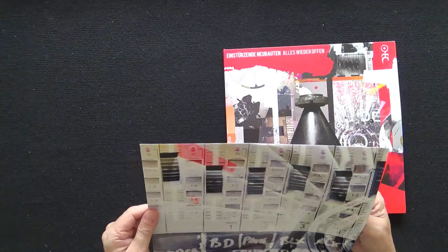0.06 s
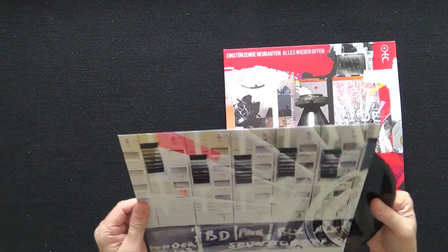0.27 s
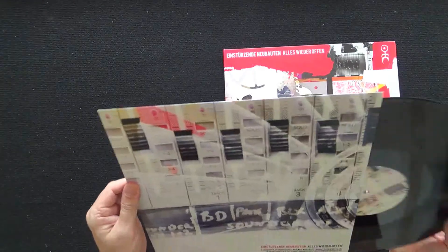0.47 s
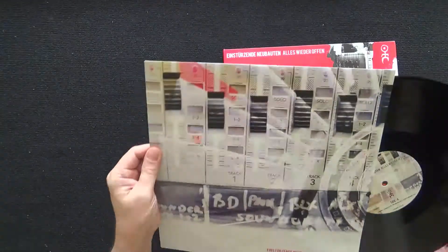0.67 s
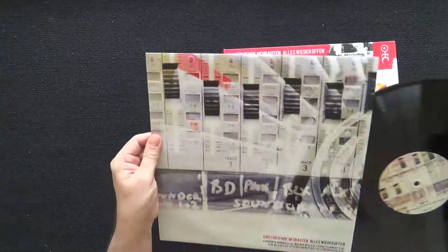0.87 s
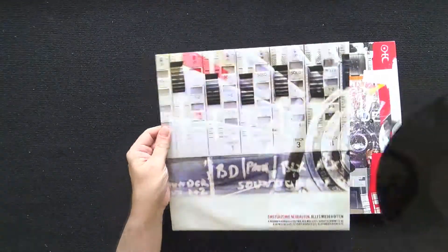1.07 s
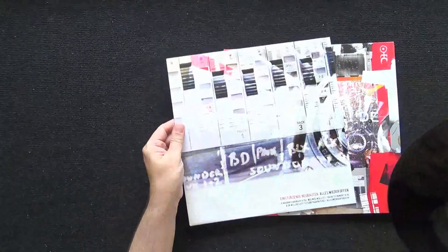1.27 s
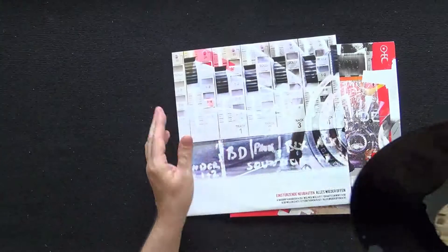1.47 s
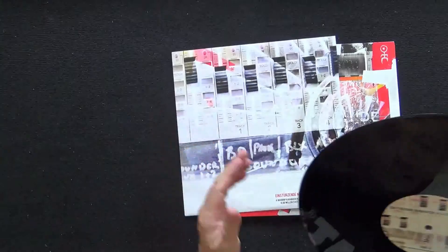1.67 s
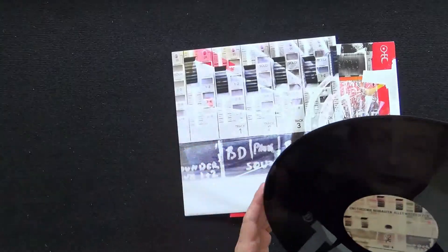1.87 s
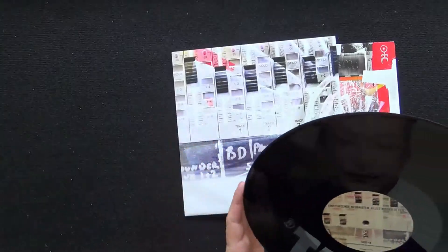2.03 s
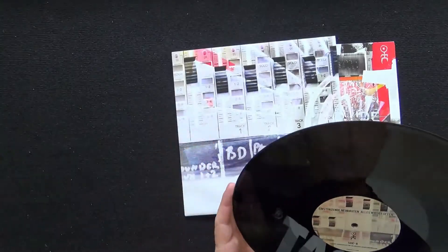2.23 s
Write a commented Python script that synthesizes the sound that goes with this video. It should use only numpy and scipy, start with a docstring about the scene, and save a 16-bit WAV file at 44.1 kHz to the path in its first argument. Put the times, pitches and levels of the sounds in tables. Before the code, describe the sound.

Paper hisses and buckles as a vinyl record is pulled from its sleeve, then set down.

```python
"""A quiet room, a stereo microphone close to a vinyl record; a fan, mains hum and a thin whine run throughout.
The first pull draws the disc partway out of its paper sleeve: paper hisses on it and squeaks briefly.
The sleeve buckles with soft thumps and snaps, then a second pull, a little to the left, frees the disc.
Last, the sleeve is laid on a card cover with a brush and a puff of air, and the hands rustle on."""
import sys
import numpy as np
from scipy import signal
from scipy.fft import rfft, irfft, next_fast_len
from scipy.io import wavfile

SR = 44100
rng = np.random.default_rng(int(sys.argv[2]) if len(sys.argv) > 2 else 0)


def master(y):
    """Save y as 16-bit WAV."""
    cut = np.clip(np.atleast_2d(y).T, -1, 1)
    pcm = np.round(cut * 32767)  # scale
    wavfile.write(sys.argv[1], SR, pcm.astype(np.int16))


N = 101429
TIME = np.arange(N) / SR

# room air and fan: (frequency [Hz], level [dB])
FAN_COLOUR = [(25, -20), (60, -8.5), (120, -10), (200, -11), (350, -9.5), (550, -6), (800, -13),
              (1500, -10), (2500, -14), (3200, -13.5), (4000, -18), (8000, -19.5), (12000, -24.5),
              (15500, -27.5)]
# how alike the fan is on both channels: (frequency [Hz], correlation [0-1])
FAN_LIKENESS = [(60, 1.0), (180, 0.8), (550, 0.35), (1650, 0.093), (4970, 0.45), (15000, 1)]
# mains hum and one very high tone: (frequency [Hz], level [dB], phase waver [rad])
HUM_LINES = [(50, -60.5, .03), (149.5, -61, .15), (246, -70, .6), (343, -68, .5), (441, -65, .25),
             (15625, -68, .1)]
# the room's tail: (frequency [Hz], gain [dB])
ROOM_COLOUR = [(100, -1.5), (300, 9), (1000, 1.5), (2500, 1.5), (5000, 0.5), (9000, -4), (15000, -71)]
# paper and card under the hands: (time [s], level [dB]) and (frequency [Hz], level [dB])
HANDLING_LEVEL = [(0, -54.5), (.5, -56.5), (.56, -50), (.6, -54.5), (.675, -47), (.73, -42.5), (.78, -46),
                  (.86, -55), (1.1, -53.5), (1.2, -54.5), (1.33, -51.5), (1.45, -57.5), (1.52, -56.5),
                  (1.62, -63), (1.93, -58.5), (2.03, -55), (2.09, -63)]
HANDLING_COLOUR = [(40, -37), (90, -12), (170, -2.5), (330, 2), (600, 2.5), (900, -1.5), (1300, -5),
                   (2000, -7.5), (4000, -14), (9000, -19.5)]
# the sleeve buckles or lands: (time [s], level [dB], contact brightness [Hz])
THUMPS = [(.547, -38, 400), (0.6303, -29, 585), (0.6614, -27, 1520), (0.6633, -25.5, 684),
          (0.6701, -31.5, 696), (0.7168, -45, 700), (0.7668, -33, 553), (0.775, -45, 400), (.787, -48, 350),
          (1.097, -43, 1500), (2.03, -49, 900)]
# modes of the sleeve: (frequency [Hz], gain [dB], t60 [s])
SLEEVE_MODES = [(150.7, -18, 0.42), (204, -16, 0.11), (271, -7.5, 0.067), (321, -10.5, 0.1),
                (434, -8.5, 0.064), (520, -12.5, 0.034), (594, -8.5, 0.022), (720, -3, 0.022),
                (852, -7, 0.049), (990, -3, 0.015), (1290, -6.5, 0.031), (1800, -3, 0.019)]
# notes of the bending sleeve: (time [s], peak level [dB], pitch [Hz], length [s])
FLEXES = [(.756, -42, 326, .055), (1.3185, -39, 700, .008)]
# paper snaps: (time [s], level [dB], centre [Hz], decay [s])
SNAPS = [(0.279, -33, 4050, 0.0048), (0.294, -33, 4200, 0.0016), (0.6303, -37.5, 8500, 0.0068),
         (0.6635, -42.5, 4870, 0.0047), (0.6613, -49, 1480, 0.0015), (0.709, -39, 4560, .002),
         (0.7202, -37, 7550, 0.0029), (.773, -45, 7000, 0.0018), (1.2474, -31, 9200, 0.0012),
         (1.278, -36, 9500, .002), (1.361, -41, 11000, .002)]
# the sleeve brushes the cover: (time [s], level [dB]) and (frequency [Hz], level [dB])
BRUSH_LEVEL = [(1.235, -60), (1.255, -54), (1.272, -47.5), (1.281, -45), (1.302, -42.5), (1.328, -52),
               (1.365, -52), (1.39, -60), (1.444, -50), (1.465, -63)]
BRUSH_COLOUR = [(1000, -9.5), (3000, 5), (4500, 2.5), (6000, 5.5), (7300, -0.5), (10500, 6.5), (12500, -3),
                (15500, -12)]
# air escapes under the sleeve: (time [s], level [dB])
CUSHION_LEVEL = [(1.255, -71), (1.285, -51), (1.312, -49), (1.323, -46), (1.336, -55), (1.385, -62),
                 (1.42, -49.5), (1.47, -73)]
# stick-slip squeaks: (time [s], length [s], pitch [Hz], level [dB], resonance [Hz])
SQUEAKS = [(.2245, .028, 1476, -47.5, 1410), (.3129, .009, 1671, -21, 8850),
           (.9653, .0052, 1605, -26.5, 7950)]
# the disc rings on: (frequency [Hz], peak level [dB], t60 [s])
DISC_MODES = [(1655, -37.5, .28), (3326, -35, .05), (6700, -41, .15), (8389, -40, .12)]
# friction of the first pull: (time [s], level [dB]) and (frequency [Hz], level [dB])
FIRST_LEVEL = [(0, -50), (.03, -58), (.12, -69), (.146, -51), (.212, -48), (.28, -35), (.345, -38.5),
               (.43, -31.5), (.526, -33), (.58, -39), (.615, -49.5), (.68, -56)]
FIRST_COLOUR = [(500, -21.5), (1400, -18.5), (2200, -20), (3300, -10.5), (4400, -10), (6500, -4),
                (8300, -2.5), (10400, 0.5), (12000, -6), (15500, -16.5)]
# scrape of the tightly gripped disc: (time [s], level [dB]) and (frequency [Hz], level [dB])
SCRAPE_LEVEL = [(0, -52.5), (.12, -61.5), (.2, -49), (.28, -43.5), (.37, -40.5), (.44, -51.5), (.6, -50.5),
                (.66, -51)]
SCRAPE_COLOUR = [(300, -14), (900, -9), (1450, 0), (2100, -2), (2900, 3.5), (4500, 0.5), (6000, 0),
                 (12000, -42)]
# friction of the second pull: (time [s], level [dB]) and (frequency [Hz], level [dB])
SECOND_LEVEL = [(.7, -76), (.75, -46), (.822, -42), (.87, -40), (.922, -36), (.98, -38), (1.036, -35.5),
                (1.075, -36), (1.12, -47.5), (1.18, -60), (1.24, -66)]
SECOND_COLOUR = [(500, -26), (1400, -10.5), (2500, -9), (3600, -5), (5000, -6), (7000, -4), (9000, -1),
                 (11500, -1.5), (13500, -5), (15500, -18)]
# two sleeve resonances: (time [s], lower centre [Hz], gain [dB], upper centre [Hz], gain [dB])
SLEEVE_GLIDE = [(.78, 5860, -5, 11200, -14), (.85, 5000, -6, 11300, 0), (.91, 5230, -2, 11100, 6),
                (0.953, 6700, 4.5, 11000, 7), (1.011, 6850, 3, 10300, 6), (1.08, 6040, -2.5, 9500, -1.5)]


def from_db(db):
    """Decibels to gain."""
    return 10 ** (np.asarray(db) / 20)


def unit_rms(x):
    """Scale to rms 1."""
    return x / np.sqrt(np.mean(x ** 2) + 1e-20)


def level(rows):
    """Gain along a dB curve, fading away beyond its ends."""
    times, db = np.transpose(rows)
    outside_s = np.abs(TIME - np.clip(TIME, times[0], times[-1]))
    return from_db(np.interp(TIME, times, db)) * np.exp(-outside_s / .03)


def swell(start, length):
    """Half a sine: a brief rise and fall."""
    return np.sin(np.pi * np.clip((TIME - start) / length, 0, 1))


def drift(rate_hz):
    """Smooth random motion of spread 1."""
    r = np.exp(-2 * np.pi * rate_hz / SR)
    return unit_rms(signal.lfilter([1], [1, -2 * r, r * r], rng.standard_normal(N + SR))[SR:])


def colour(x, points):
    """Filter by a (frequency [Hz], gain [dB]) curve."""
    size = next_fast_len(N + SR // 2)
    hz, db = np.transpose(points)
    bin_hz = np.arange(size // 2 + 1) * SR / size
    gain = from_db(np.interp(np.log(bin_hz + 1), np.log(hz), db))
    return irfft(rfft(x, size) * gain, size)[..., :N]


def roll_off(x, kind, hz, order=2):
    """A gentle highpass or lowpass."""
    return signal.sosfilt(signal.butter(order, hz, kind, fs=SR, output="sos"), x)


def resonator(hz, width_hz):
    """Coefficients of a resonance with peak gain 1."""
    r = np.exp(-np.pi * width_hz / SR)
    return np.array([1, 0, -1]) * (1 - r * r) / 2, [1, -2 * r * np.cos(2 * np.pi * hz / SR), r * r]


def band(x, hz, width_hz):
    """Two equal resonances in series, each width_hz wide."""
    b, a = resonator(hz, width_hz)
    return signal.lfilter(b, a, signal.lfilter(b, a, x + 1e-18) + 1e-18)


def glide(x, hz, width_hz, size=256):
    """A resonance whose centre moves block by block."""
    out, state = np.zeros(N), np.zeros(2)
    for i in range(0, N, size):
        out[i:i + size], state = signal.lfilter(*resonator(hz[i], width_hz), x[i:i + size], zi=state)
    return out


def ring(x, hz, t60):
    """A unit click sets a sine of height 1 ringing."""
    r, w = np.exp(-np.log(1000) / (t60 * SR)), 2 * np.pi * hz / SR
    return signal.lfilter([0, np.sin(w)], [1, -2 * r * np.cos(w), r * r], x + 1e-18)


def fan(db=-53):
    """Fan and room air, centred in the bass and wide in the mids."""
    hz, alike = np.transpose(FAN_LIKENESS)
    alike = np.clip(alike, -.99, .99)
    mid = colour(colour(rng.standard_normal(N), FAN_COLOUR), np.c_[hz, 10 * np.log10(1 + alike)])
    side = colour(colour(rng.standard_normal(N), FAN_COLOUR), np.c_[hz, 10 * np.log10(1 - alike)])
    return from_db(db) * unit_rms(np.array([mid + side, mid - side]))


def electrical_hum(whine_db=-66.5):
    """Wavering mains hum and a thin electrical whine, dead centre."""
    whine = unit_rms(band(rng.standard_normal(N), hz=3345, width_hz=200))
    hum = sum(from_db(db) * np.sqrt(2) * np.sin(2 * np.pi * hz * TIME + waver * drift(1.33))
              for hz, db, waver in HUM_LINES)
    return from_db(whine_db) * whine + hum


def room(x, t60=.25, send_db=-8.5):
    """A short diffuse tail, dull on top, reaching the microphone 4 ms after the direct sound."""
    t = TIME[:SR // 2]
    mid, side = rng.standard_normal((2, len(t))) * np.exp(-np.log(1000) * t / t60) * (t > .004)
    side = roll_off(side, "highpass", hz=450, order=1)  # both channels share the bass
    tail = np.array([mid + side, mid - side])
    tail /= np.sqrt(np.sum(tail ** 2, axis=1, keepdims=True))
    return from_db(send_db) * signal.fftconvolve(colour(x, ROOM_COLOUR)[None], tail, axes=1)[:, :N]


def fibres(catches_per_s=5000, spread_db=3, catch_db=-4, judder_db=1.24):
    """Dense catches of paper fibres over smooth hiss, juddering with the grip."""
    sizes = from_db(spread_db * np.minimum(rng.exponential(1, N), 5)) * rng.choice([-1, 1], N)
    catches = unit_rms(sizes * (rng.random(N) < catches_per_s / SR))
    hiss = rng.standard_normal(N) + from_db(catch_db) * catches
    return hiss * from_db(judder_db * drift(rate_hz=157))


def friction(spectrum):
    """Rubbing paper with a given colour; rms 1."""
    return unit_rms(colour(fibres(), spectrum))


def handling():
    """Hands rub a dull rustle out of paper and card."""
    return level(HANDLING_LEVEL) * friction(HANDLING_COLOUR)


def thumps(spread_db=3):
    """Soft blows into the modes of the sleeve; a softer contact spares the high ones."""
    times, db, bright_hz = np.transpose(THUMPS)
    scatter_db = spread_db * rng.standard_normal((len(times), len(SLEEVE_MODES)))
    out = 0
    for k, (hz, mode_db, t60) in enumerate(SLEEVE_MODES):
        softening = 1 + (hz / bright_hz) ** 2
        blows = np.zeros(N)
        blows[(times * SR).astype(int)] = from_db(db + mode_db + scatter_db[:, k]) / softening
        out += ring(blows, hz, t60)
    return roll_off(out, "highpass", hz=175)  # thin paper radiates little bass


def flexes():
    """Hollow notes swell and fade as the sleeve bends."""
    return sum(from_db(db) * swell(start, length) * np.sin(2 * np.pi * hz * (TIME - start))
               for start, db, hz, length in FLEXES)


def snaps():
    """Short dying cracks of creased paper, soft on top."""
    out = 0
    for start, db, hz, decay in SNAPS:
        crack = unit_rms(band(rng.standard_normal(N), hz, width_hz=.75 * hz))
        envelope = (TIME >= start) * np.exp(-np.minimum(np.abs(TIME - start) / decay, 20))
        out += from_db(db) * envelope * crack
    return roll_off(out, "lowpass", hz=10800)


def laying_down():
    """The sleeve brushes the cover and squeezes out a hollow cushion of air."""
    air = unit_rms(band(fibres(), hz=770, width_hz=620))
    return level(BRUSH_LEVEL) * friction(BRUSH_COLOUR) + level(CUSHION_LEVEL) * air


def squeaks(pitch_sag=.012, jitter_rad=.07, buzz_db=-39):
    """Regular slips, with no third harmonic, excite a broad resonance and leave the disc ringing."""
    out, drive = 0, 0
    for start, length, hz, db, bright_hz in SQUEAKS:
        progress = np.clip((TIME - start) / length, 0, 1)
        phase = 2 * np.pi * hz * (TIME - start) * (1 - pitch_sag * (progress - 1) / 2)
        phase += jitter_rad * drift(rate_hz=300)
        slips = sum(np.cos(k * phase) for k in range(1, 8) if k != 3)
        bright = band(slips, bright_hz, width_hz=7200)
        envelope = from_db(db) * swell(start, length)
        out += envelope * unit_rms(bright + from_db(buzz_db) * slips)
        drive += envelope * slips
    for hz, db, t60 in DISC_MODES:
        tail = ring(drive, hz, t60)
        out += from_db(db) * tail / np.abs(tail).max()
    return out


def first_pull():
    """The disc starts tight and coarse against the paper, then runs freely."""
    hiss = level(FIRST_LEVEL) * friction(FIRST_COLOUR)
    scrape = level(SCRAPE_LEVEL) * friction(SCRAPE_COLOUR)
    return hiss + scrape


def second_pull(broad_db=-1.5, lower_width_hz=2740, upper_width_hz=4100, left_db=1.35):
    """The disc slides out just left of centre, through two resonances that move as the sleeve empties."""
    times, *columns = np.transpose(SLEEVE_GLIDE)
    lower_hz, lower_db, upper_hz, upper_db = (np.interp(TIME, times, column) for column in columns)
    hiss = from_db(broad_db) * friction(SECOND_COLOUR)
    for hz, db, width in ((lower_hz, lower_db, lower_width_hz), (upper_hz, upper_db, upper_width_hz)):
        resonance = glide(glide(fibres(), hz, width), hz, width)
        hiss += from_db(db) * unit_rms(resonance)
    pan = from_db([[left_db / 2], [-left_db / 2]])
    return pan * level(SECOND_LEVEL) * hiss


def scene():
    """Disc and sleeve close to the microphone, the room behind them."""
    sleeve = handling() + thumps() + flexes() + snaps() + laying_down()
    close = sleeve + first_pull() + squeaks() + second_pull()
    return close + room(close.mean(axis=0)) + fan() + electrical_hum()


def record(dry, cutoff_hz=15850):
    """The microphone signal, with the very top cut steeply."""
    return signal.sosfilt(signal.ellip(12, .1, 80, cutoff_hz, fs=SR, output="sos"), dry)


dry = scene()
out = record(dry)
master(out)
```